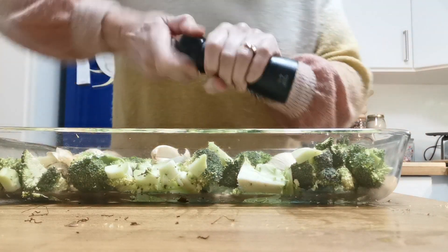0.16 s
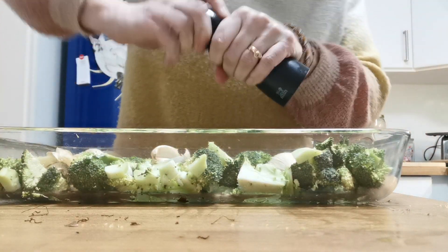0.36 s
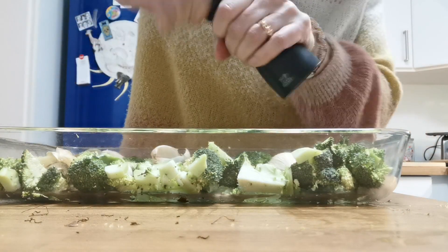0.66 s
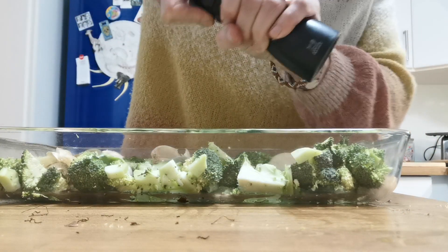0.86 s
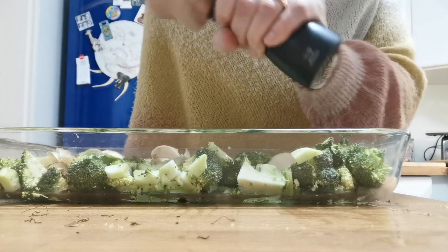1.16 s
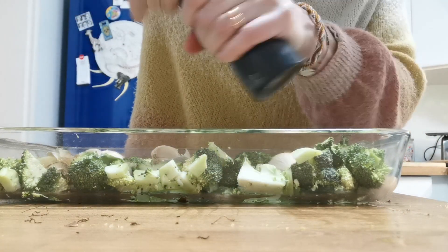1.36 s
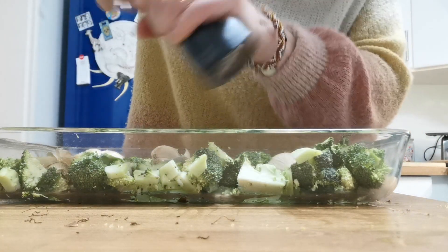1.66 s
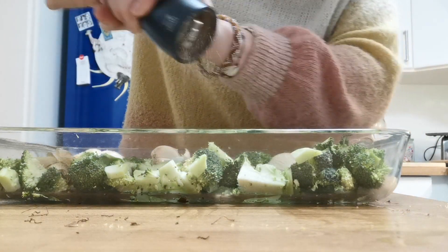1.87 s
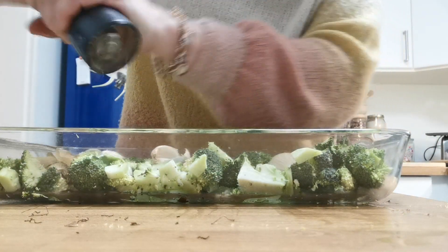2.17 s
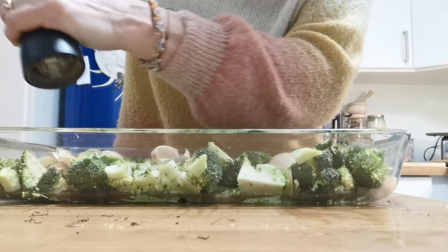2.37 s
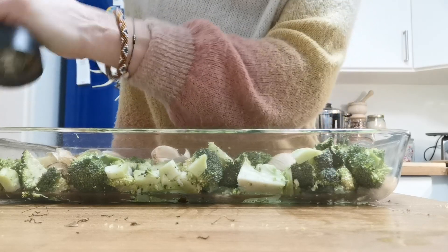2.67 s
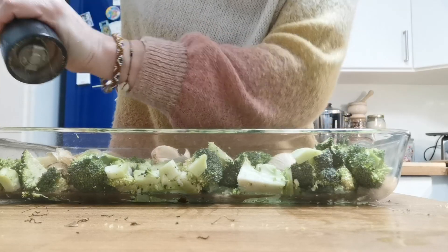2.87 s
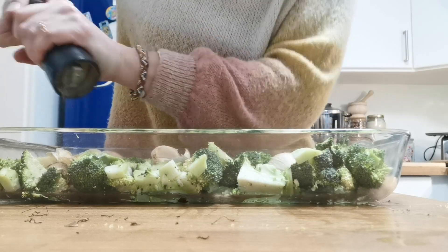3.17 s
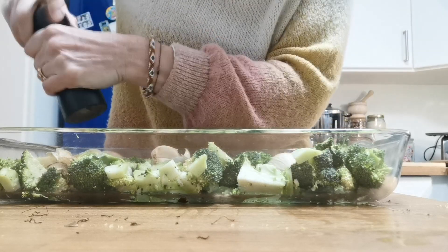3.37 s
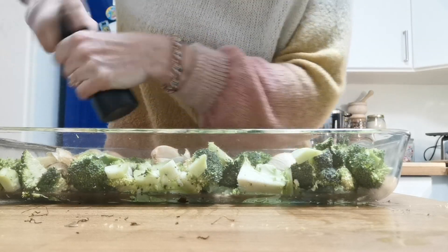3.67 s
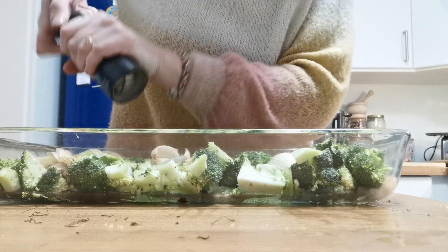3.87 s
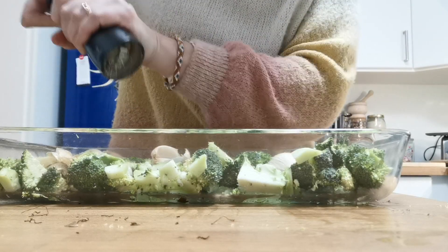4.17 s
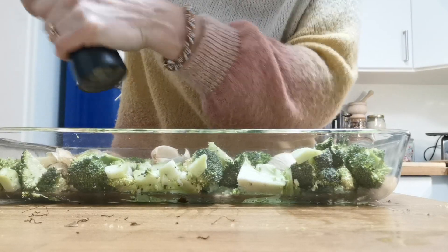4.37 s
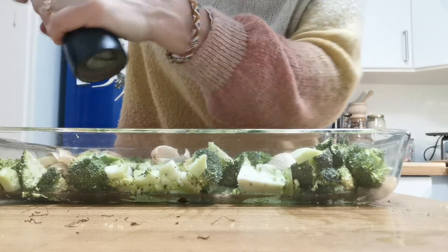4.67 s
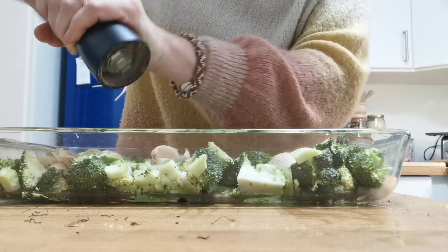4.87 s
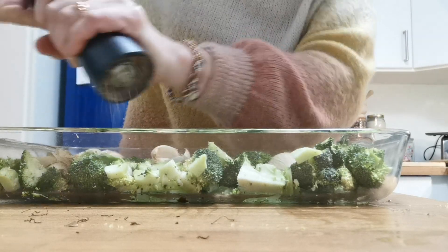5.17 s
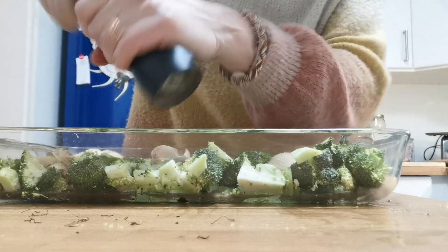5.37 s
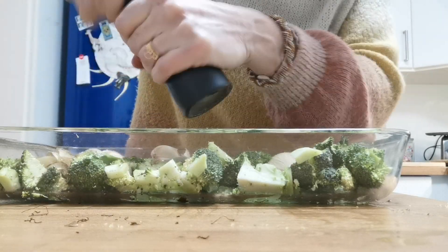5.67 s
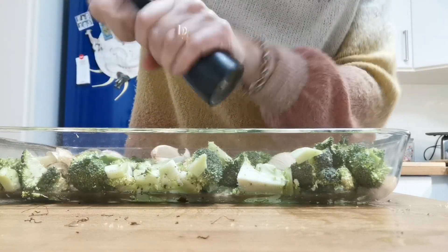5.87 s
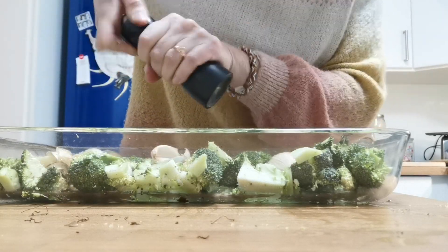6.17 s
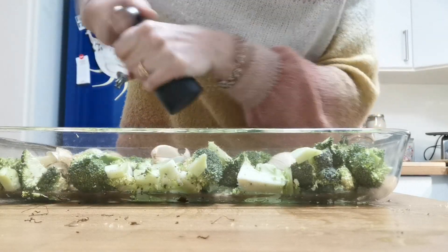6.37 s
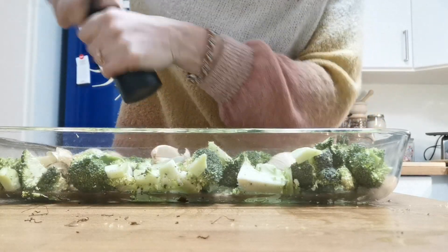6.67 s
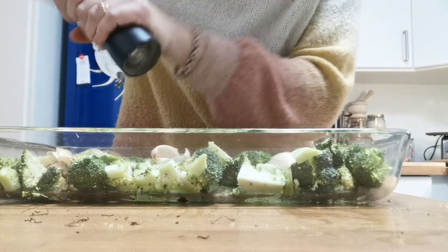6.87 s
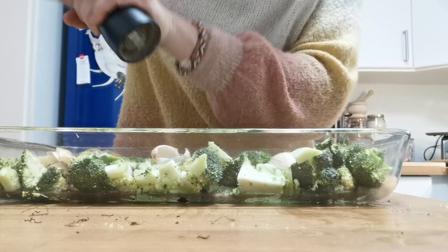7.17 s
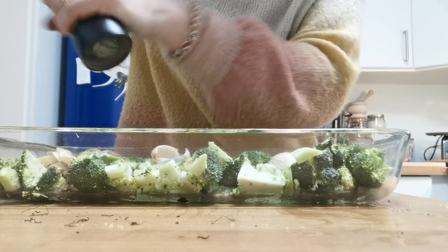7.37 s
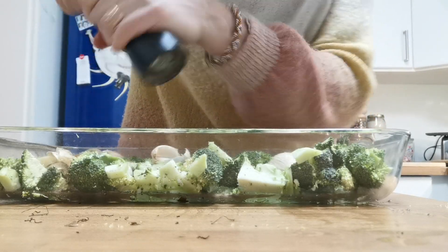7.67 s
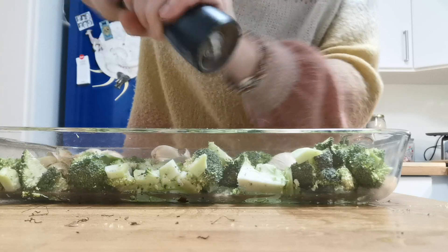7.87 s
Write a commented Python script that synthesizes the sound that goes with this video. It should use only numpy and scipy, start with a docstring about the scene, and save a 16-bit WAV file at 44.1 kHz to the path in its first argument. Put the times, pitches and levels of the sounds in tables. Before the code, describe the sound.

A hand pepper mill is twisted quickly back and forth, about six strokes a second, from start to finish. Each stroke is a dry, gritty crunch of peppercorns, with sharp cracks and small clicks ringing in the mill's body. The microphone is close, in a small, hard-walled kitchen with a short echo and faint room tone.

```python
"""A small, hard-walled kitchen; a phone lies on the worktop, its two microphones close to a dish.
Over the dish a hand pepper mill is twisted back and forth, six strokes a second.
In each stroke the burrs crush peppercorns: a dense run of tiny fractures and a few loud cracks
ring the mill's body, and wedged corns judder. Behind it are a short echo and faint room tone."""
import sys
import numpy as np
from scipy import signal
from scipy.fft import rfft, irfft
from scipy.io import wavfile
from scipy.ndimage import uniform_filter1d, minimum_filter1d

SR = 44100
rng = np.random.default_rng(int(sys.argv[2]) if len(sys.argv) > 2 else 0)


def transcribe(signal):
    """Save signal, clipped to [-1, 1], as a 16-bit WAV file at the path in sys.argv[1]."""
    frames = np.atleast_2d(signal).T
    limited = np.clip(frames, -1, 1)
    pcm = np.round(limited * 32767).astype(np.int16)
    wavfile.write(sys.argv[1], SR, pcm)


N = 353682
TIME = np.arange(N) / SR
FFT_SIZE = 3 * 2 ** 17
FREQ = np.maximum(np.arange(FFT_SIZE // 2 + 1) * SR / FFT_SIZE, 1)

# the wrist twists out and back: out_start_s, back_start_s, out_force_db, back_force_db
TWISTS = [(0.041, 0.236, -34, -23), (0.412, 0.581, -22, -19.5), (0.738, 0.905, -21.5, -24.5),
          (1.091, 1.246, -22, -21), (1.443, 1.584, -21.5, -22), (1.768, 1.91, -20.5, -21.5),
          (2.088, 2.24, -22, -20.5), (2.425, 2.565, -20.5, -21), (2.759, 2.897, -20.5, -20),
          (3.081, 3.223, -21, -19.5), (3.395, 3.554, -21, -20), (3.75, 3.89, -23.5, -20.5),
          (4.059, 4.2, -23, -19.5), (4.389, 4.508, -19.5, -22.5), (4.721, 4.845, -25.5, -26.5),
          (5.066, 5.2, -21, -22.5), (5.379, 5.514, -23, -22.5), (5.698, 5.833, -21.5, -21),
          (6.021, 6.163, -27, -21.5), (6.356, 6.503, -21, -20), (6.714, 6.84, -22, -21),
          (7.036, 7.168, -25, -23.5), (7.344, 7.484, -22, -21.5), (7.684, 7.835, -25.5, -24)]
# resonances of the barrel and the burrs: pitch_hz, width_hz, boost_db
RESONANCES = [(581, 49, -0.5), (816, 112, 3), (1414, 155, 1.5), (2912, 210, 2.5), (3734, 96, 1),
              (5805, 500, 6), (7090, 740, 3)]
# the mill turns and wanders over the dish: time_s, treble_left_minus_right_db, middle_db
SWAY = [(0, 2, 10.5), (1.301, 1.5, 5.5), (2.2, 0, 4.5), (3.4, -0.5, 1), (4.6, -4.5, 5.5), (6.6, -5, 3),
        (7.6, -2, 3)]


def undb(db):
    """Decibels to gain."""
    return 10 ** (np.asarray(db) / 20)


def across(points):
    """Join (Hz, value) points on a log-frequency axis."""
    hz, value = np.transpose(points)
    return np.interp(np.log(FREQ), np.log(hz), value)


def follow(curve):
    """Join rows of (time_s, values...) into one signal per value column."""
    times, *columns = np.transpose(curve)
    return [np.interp(TIME, times, column) for column in columns]


def below(hz, order):
    """Soft low-pass response, one half at hz."""
    return 1 / (1 + (FREQ / hz) ** order)


def peak(hz, width_hz):
    """Bell-shaped response of one resonance."""
    return 1 / (1 + (2 * (FREQ - hz) / width_hz) ** 2)


def shape(x, response):
    """Filter by a frequency response."""
    return irfft(rfft(x, FFT_SIZE) * response, FFT_SIZE)[..., :N]


def causal(db):
    """The response with this gain that rings only after the blow."""
    cepstrum = irfft(db * np.log(10) / 20)
    cepstrum[1:FFT_SIZE // 2] *= 2
    cepstrum[FFT_SIZE // 2 + 1:] = 0
    return np.exp(rfft(cepstrum))


def fade(energy, t60_s):
    """Let each impulse of energy die away; the total is kept."""
    keep = np.exp(-2 * np.log(1000) / (t60_s * SR))
    return signal.lfilter([1 - keep], [1, -keep], energy)


def room_tone(mid_db=-53):
    """The quiet kitchen: a faint low rumble and hiss."""
    # colour of the background: frequency_hz, gain_db
    colour = [(20, 2), (70, -2), (1000, 1.5), (15000, -25)]
    mid, side = shape(rng.standard_normal((2, N)), undb(across(colour)))
    return undb(mid_db) * (mid + side * np.array([[1], [-1]]) / np.sqrt(2)) / np.std(mid)


def room_echo(x, tail_db=-2.5, t60_s=0.59, gap_s=0.0026, build_s=0.0039, near_db=-13, near_s=0.0021):
    """Hands and dish reflect at once; the cupboards blur into a short tail."""
    # how unlike the echo is at the two microphones: frequency_hz, side_minus_mid_db
    spread = [(750, -27), (2000, 2)]
    t = TIME[:SR // 2]
    tail = np.clip((t - gap_s) / build_s, 0, 1) * np.exp(-np.log(1000) * t / t60_s)
    near = t * np.exp(-2 * t / near_s)
    outline = undb(tail_db) * tail / np.linalg.norm(tail) + undb(near_db) * near / np.linalg.norm(near)
    edges = [0] + [int(start * SR) for start, *_ in strokes()[1:]] + [N]
    echo = np.zeros((2, N + len(t)))
    for a, b in zip(edges, edges[1:]):  # the mill moves, so each stroke echoes anew
        reflections = outline * rng.standard_normal((2, len(t)))
        echo[:, a:b + len(t) - 1] += signal.fftconvolve(x[None, a:b], reflections, axes=1)
    width = undb(across(spread))
    colour = undb(-5 * below(1000, 4) - 12.5 * (1 - below(8000, 4)))  # weaker in bass and top
    mid, side = shape(echo, colour * np.array([np.ones_like(width), width]) / np.sqrt(1 + width ** 2))
    return np.array([mid + side, mid - side])


def strokes(out_rise_s=0.048, out_share=0.86, back_rise_s=0.025, back_s=0.12):
    """Each twist is a swelling push and a return that bites at once."""
    rows = []  # start_s, hardest_s, end_s, bite_share, force_db, body_db, edge_db
    for out, back, out_db, back_db in TWISTS:
        rows.append((out, out + out_rise_s, out + out_share * (back - out), 0.29, out_db, -3.23, 0))
        rows.append((back, back + back_rise_s, back + back_s, 0.49, back_db, -2.5, 1))
    return np.array(rows)


def hand_force(hold_until_share=0.62, hold=0.76, release=0.12):
    """In each stroke the burrs bite, are pressed to full force, hold a share of it and stop."""
    push = np.zeros(N)
    for start, hardest, end, bite, force_db, *_ in strokes():
        times = np.sort([start, hardest, start + hold_until_share * (end - start), end])
        push += np.interp(TIME, times, [bite, 1, hold, release], left=0, right=0) * undb(force_db)
    return push


def vibration(energy):
    """Two jagged vibrations with this energy: what both microphones share, and what sets them apart."""
    return np.sqrt(energy) * rng.standard_normal((2, N))


def fractures(per_s, scatter_db, t60_s):
    """Energy of a run of tiny breaks, uneven in time and size; the steady push keeps the mean at 1."""
    sizes = undb(scatter_db * np.clip(rng.standard_normal(N), -2, 2))
    energy = fade((rng.random(N) < per_s / SR) * sizes ** 2, t60_s)
    return energy / (uniform_filter1d(energy, size=1100) + 1e-9)


def judders(length_s=0.032, q=6, gain_db=1.5, stray_low_hz=2504, stray_high_hz=6510, stray_db=-7.5):
    """A wedged corn slips in a quick run that swells and fades in one resonance of barrel or burrs."""
    # judders of wedged corns: centre_s, pitch_hz, relative_level_db
    wedged = [(0.47, 4300, -23.5), (.822, 630, -29.5), (.848, 830, -31), (1.972, 820, -30),
              (3.285, 3050, -34.5), (4.55, 690, -32), (5.26, 2880, -23), (5.415, 243, -41),
              (5.594, 242, -41.5), (5.731, 181, -44), (6.212, 566, -27), (6.519, 546, -31.5),
              (7.878, 390, -35)]
    strays = []  # every stroke also has a brief high judder in the burrs, at a chance pitch
    for start, _, end, _, force_db, *_ in strokes():
        when, pitch = rng.random(2)
        centre_s = start + (0.33 + 0.4 * when) * (end - start)
        hz = stray_low_hz * (stray_high_hz / stray_low_hz) ** pitch
        strays.append((centre_s, hz, force_db + stray_db))
    out, n = np.zeros(N), int(length_s * SR)
    for centre_s, hz, db in strays + wedged:
        slips = rng.standard_normal(SR // 10)
        ring = signal.lfilter(*signal.iirpeak(hz, q, fs=SR), slips)
        ring = signal.lfilter(*signal.iirpeak(hz, 2, fs=SR), ring)[-n:] * np.hanning(n)
        first = int(centre_s * SR) - n // 2
        out[first:first + n] += ring / np.std(ring) * undb(db + gain_db)
    return out


def chatter(push, per_s=110, shift_db=8):
    """Some breaks ring just one resonance; which ones are favoured changes with every stroke."""
    out = 0
    hardest = strokes()[:, 1]
    for hz, width_hz, _ in RESONANCES:
        favour = undb(np.interp(TIME, hardest, shift_db * rng.uniform(-1.04, 1, len(hardest))))
        breaks = push * favour * vibration(fractures(per_s, scatter_db=-1.5, t60_s=0.0041))
        out = out + signal.lfilter(*signal.iirpeak(hz, hz / (2 * width_hz), fs=SR), breaks)
    return out


def snaps(push, t60_s=0.012, break_s=0.0015, crumbs_per_s=12, crumb_db=-29, pieces_per_s=14, piece_db=5):
    """Energy of loose crumbs, of pieces and whole corns that split, and of the burrs' turning clicks."""
    # the loudest peppercorns that snap: start_s, relative_level_db
    corns = [(.027, -29), (0.081, -20), (.222, -21.5), (0.331, -19.5), (0.942, -14), (0.976, -12.5),
             (1.589, -24), (1.8, -17.5), (1.808, -15), (1.902, -18), (2.476, -19), (2.569, -22),
             (3.101, -17.5), (3.882, -17.5), (4.111, -15.5), (4.408, -14.5), (4.75, -16), (4.851, -20),
             (4.889, -12), (4.918, -16), (5.082, -13.5), (5.216, -16), (5.256, -13), (6.049, -18),
             (6.367, -21), (6.553, -15.5), (7.09, -15), (7.379, -12.5), (7.385, -16.5), (7.584, -14)]
    crumbs = (rng.random(N) < crumbs_per_s / SR) * rng.random(N) * undb(crumb_db) ** 2
    pieces = (rng.random(N) < pieces_per_s / SR) * rng.random(N) * (push * undb(piece_db)) ** 2
    energy = crumbs + pieces
    clicks = []  # one at each turn of the wrist, louder on the return
    for out, back, out_db, back_db in TWISTS:
        luck_db = rng.uniform(-2, 2, 2)
        clicks += [(out, out_db - 14 + luck_db[0]), (back, back_db - 3.5 + luck_db[1])]
    n = int(break_s * SR)
    for start_s, db in corns + clicks:
        first = int(start_s * SR)
        energy[first:first + n] += undb(db) ** 2 / n
    return fade(energy * SR / 500, t60_s)


def grip(x, body_per_force=-0.42, top_per_pan=0.62):
    """Stroke direction and force set the tone; the top grows as the mill's mouth swings to the right."""
    # slow drift of the tone: time_s, bass_db, treble_db, burr_ring_db, top_db
    drift = [(0, 4, 3, -6, -6), (.7, 1.5, 1.5, -2.5, 3), (1.5, 1.5, 0, 4.5, -2), (2.2, -1, -1.3, 0.5, 0),
             (3, -0.5, -1.5, -1.5, 0.5), (4.2, -1, -4, 2, -0.5), (5.3, 2.5, -3, 0.5, 1),
             (6.5, 1, -1, -6, 0), (7.2, 0.5, -2.4, 0.5, 1.5), (8, -4.5, -3.5, 2.5, -1.5)]
    bass_db, treble_db, ring_db, top_db = follow(drift)
    pan_db, middle_db = follow(SWAY)
    start, _, end, _, force_db, body_db, edge_db = strokes().T
    body_db = body_db + body_per_force * (force_db - force_db.mean())  # harder: more crunch than knock
    times = np.column_stack([start, end]).ravel()
    held_body_db = np.interp(TIME, times, np.repeat(body_db, 2))
    held_edge_db = np.interp(TIME, times, np.repeat(edge_db, 2))
    bands = [(below(1020, 8), held_body_db + bass_db),
             (below(2100, 8) - below(1020, 8), middle_db),
             (below(8600, 8) - below(4800, 8), held_edge_db + treble_db),
             (peak(5800, width_hz=500), ring_db),
             (1 - below(8600, 8), held_edge_db + top_db - top_per_pan * pan_db)]
    return x + sum(shape(x, band) * (undb(db) - 1) for band, db in bands)


def pepper_mill(crunch_db=-3, shard_db=-3, chatter_db=-5, crack_db=1.36):
    """Fractures crackle in the burrs and the coarser ones knock the barrel; all ring one body."""
    # broad colour of a fracture heard through the mill: frequency_hz, gain_db
    colour = [(50, -32), (110, -22), (200, -16), (340, -2.5), (600, 0.5), (900, -3), (1060, -11.5),
              (1750, -9.5), (2400, -2.5), (4600, -0.5), (7700, -5.5), (8600, -19), (11000, -28),
              (15000, -37)]
    push = hand_force()
    fine = fractures(per_s=750, scatter_db=3.0, t60_s=0.017)
    coarse = fractures(per_s=200, scatter_db=6.5, t60_s=0.012)
    brittle = fractures(per_s=120, scatter_db=-3.0, t60_s=0.049)
    bass, top = below(1100, 4), 1 - below(7500, 10)  # the barrel takes the bass, brittle shards the top
    crunch = shape(push * vibration(fine), np.sqrt((1 - bass) * (1 - top))) * undb(crunch_db)
    # knocks and shards come mostly at the hardest part of a stroke
    peak_push = 1e-9 - minimum_filter1d(-push, size=4400)
    hard_push = push * np.sqrt(2 * push / peak_push)
    knocks = shape(hard_push * vibration((fine + coarse) / 2), np.sqrt(bass))
    shards = shape(hard_push * vibration((fine / 2 + brittle) / 2), np.sqrt(top)) * undb(shard_db)
    cracks = shape(vibration(snaps(push)), undb(crack_db - 4 * bass + 2 * top))
    breaks = crunch + knocks + shards + cracks + undb(chatter_db) * chatter(push)
    body = causal(across(colour) + sum(db * peak(hz, width_hz) for hz, width_hz, db in RESONANCES))
    return shape(grip(breaks), body / np.sqrt(np.mean(abs(body) ** 2)))


def scene(shadow_hz=1200, scatter_hz=3500, scatter_db=-4):
    """The close mill reaches both microphones directly and by the room; the phone shades the far one."""
    # balance of the two microphones: frequency_hz, left_minus_right_db
    mic_balance = [(100, -2), (700, 0), (1300, 2.5), (2700, 3), (4700, 3.5), (5800, -1), (7800, 3),
                   (9000, -2.5), (14000, -1.5)]
    # phase between them, which long waves feel only in part: frequency_hz, left_lead_rad
    mic_phase = [(1000, 0), (2800, .5), (3900, .1), (4200, -1.9), (7500, -1.8), (11000, -.8)]
    sides = np.array([[1], [-1]]) / 2
    short_waves = 1 - below(shadow_hz, 2)  # long waves reach both microphones alike
    shared, apart = pepper_mill()
    shared = shared + judders()
    # each break throws its treble in a direction of its own
    scatter = undb(scatter_db) * (1 - below(scatter_hz, 2))
    pair = shared + 2 * sides * shape(apart, scatter)
    phase_shift = np.exp(1j * sides * short_waves * across(mic_phase))
    direct = shape(pair, phase_shift / np.sqrt(1 + scatter ** 2))
    heard = shape(direct + room_echo(shared), undb(sides * across(mic_balance)))
    pan_db, _ = follow(SWAY)
    treble_sway = shape(heard, short_waves) * (undb(sides * pan_db) - 1)
    return heard + treble_sway + room_tone()


def record(dry, top_hz=15600):
    """The phone clips at full scale and cuts the top."""
    top_cut = signal.ellip(10, 0.2, 80, top_hz, fs=SR, output="sos")
    return signal.sosfilt(top_cut, np.clip(dry, -1, 1))


dry = scene()
out = record(dry)
transcribe(out)
```